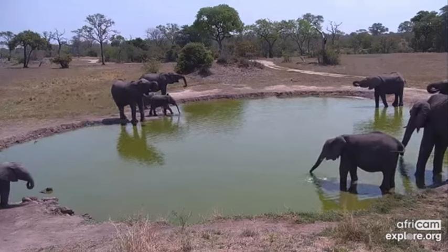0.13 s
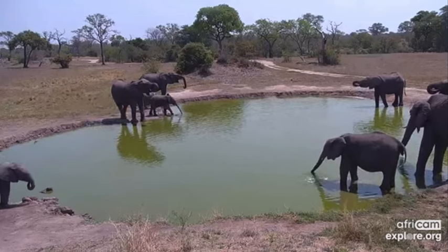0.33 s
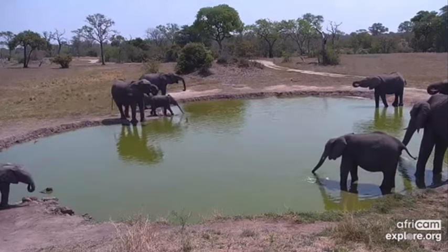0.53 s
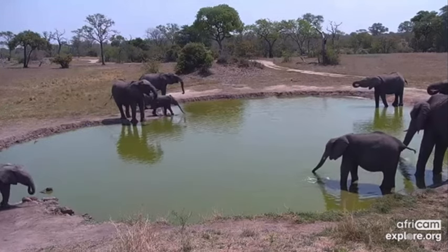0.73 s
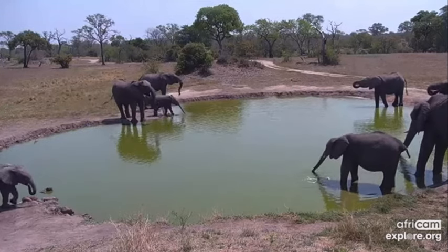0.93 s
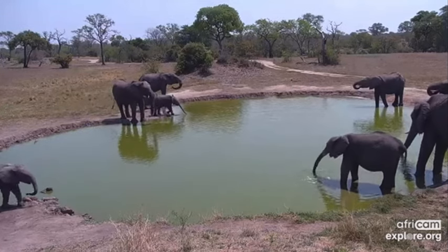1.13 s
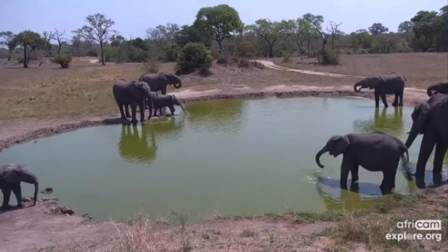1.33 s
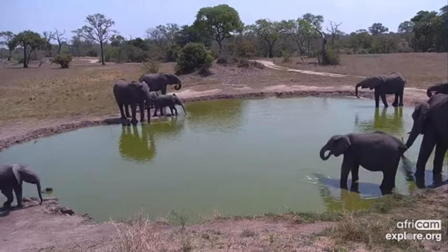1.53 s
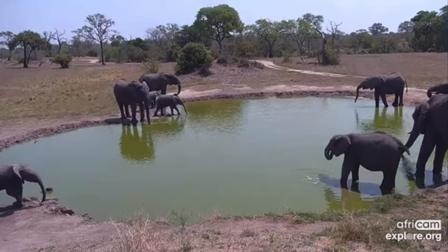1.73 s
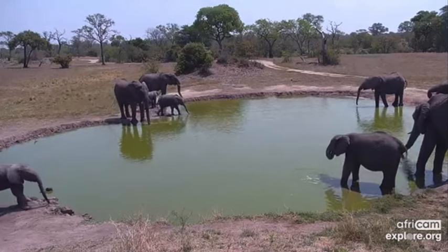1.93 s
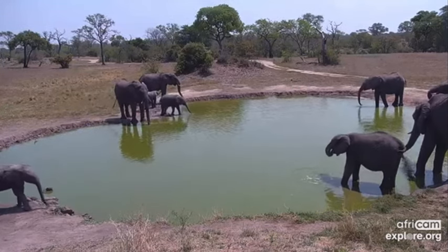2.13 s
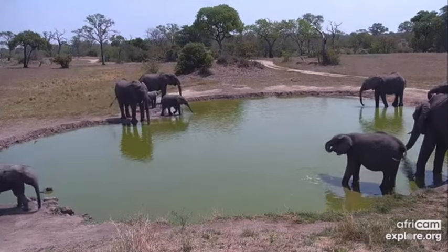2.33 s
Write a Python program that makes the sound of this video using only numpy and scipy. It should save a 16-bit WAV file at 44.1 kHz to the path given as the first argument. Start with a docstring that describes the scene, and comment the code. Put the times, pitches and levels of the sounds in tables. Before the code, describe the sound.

A rough, fluttering elephant rumble enters after nearly a second of water sloshing and bubbling, then stops; more splashing, drips and small bird calls follow. Open waterhole, distant microphone, soft hiss and thin insect trill.

```python
"""Water sloshes, bubbles and drips from the start as animals wade and drink at a waterhole, while insects
trill high over the far hiss of the plain: all shaped noise, with damped and gliding tones for the bubbles.
A wader gives a metallic chip of rattling tones. Then a deep rumble hums in steady low harmonics, and over it
an elephant rumbles: slow, uneven pulses of the vocal folds ring the throat's moving resonances.
A bird's whistle falls, a faint low coo pulses, and the wader chips again; these are gliding tones."""
import sys
import numpy as np
from scipy import signal
from scipy.fft import rfft, irfft, next_fast_len
from scipy.io import wavfile
from scipy.ndimage import uniform_filter1d, map_coordinates

SR = 44100
rng = np.random.default_rng(int(sys.argv[2]) if len(sys.argv) > 2 else 0)


def output_pcm(signal):
    """Save a mono or channel-first signal as 16-bit PCM at the path in sys.argv[1].

    Samples are clipped to [-1, 1] before scaling.
    """
    pcm = np.clip(np.atleast_2d(signal).T, -1, 1) * 32767
    wavfile.write(sys.argv[1], SR, np.round(pcm).astype(np.int16))


N = 110250
T = np.arange(N) / SR  # time of every sample, s

# All table levels are relative: the functions add small trims to them.
# Far hiss of the plain: f/Hz, level per Hz/dB
PLAIN_SPECTRUM = [(15, -45), (25, 10.5), (439, -5), (695, -6), (1100, -9), (3760, -10), (4390, -14.5),
                  (7320, -8), (8750, -14.5), (11300, -25.5), (14700, -61), (22000, -120)]
# Insects: t/s, trill level/dB, upper band level/dB
INSECT_LEVELS = [(0, -62, -44), (.15, -64, -53.5), (.6, -48.5, -47.5), (.68, -57, -46.5), (.8, -60, -53),
                 (.88, -43, -48.5), (1.12, -46.5, -50), (1.25, -61, -50.5), (1.8, -55, -53),
                 (2.2, -52.5, -50.5), (2.32, -51.5, -52.5), (2.5, -41, -48)]
# Falling bird whistle: t/s, f/Hz, level/dB
WHISTLE_PATH = [(1.508, 4890, -63), (1.512, 5030, -49), (1.518, 5000, -31), (1.53, 4713, -32),
                (1.566, 4760, -36), (1.592, 4480, -34), (1.606, 4300, -57)]
# Faint low coo: t/s, f/Hz, level/dB
COO_PATH = [(2.09, 545, -52), (2.146, 574.6, -37), (2.162, 564, -50), (2.184, 575, -35), (2.2, 570, -57),
            (2.212, 577, -38.5), (2.33, 585, -56)]
# The wader's chips: t/s, level/dB, f/Hz, time before the fade/s
CHIP_CALLS = [(.6528, -29.5, 1925, .034), (2.2, -32, 1885, .037)]
# Tones in a chip: multiple of f, level/dB, rattle knots per second, rattle depth,
# swell toward the crest/dB, time to fade by 60 dB/s
CHIP_PARTS = [(1, 5, 260, .6, 6, .07), (1.93, 4.5, 600, 1.0, 18, .14), (3.07, 2, 750, 1.1, 35, .1),
              (4.12, -10, 400, 1.1, 50, .05)]
# Moving water: t/s, gurgle level/dB, spray level/dB, fizz level/dB
SLOSH_LEVELS = [(0, -37, -67, -61), (.1, -39, -46, -56.5), (.21, -41.5, -41.5, -56),
                (.23, -29.5, -34.5, -53), (.4, -34, -34.5, -53.5), (.53, -35, -39, -54),
                (.56, -42, -40.5, -53.5), (.64, -38, -43, -59.5), (.7, -38.5, -39.5, -49),
                (.8, -35.5, -41.5, -91), (.88, -46.5, -49, -61.5), (.97, -39, -43.5, -61),
                (1.25, -38.5, -38, -60.5), (1.38, -30, -34, -51), (1.6, -27, -34, -49.5),
                (1.69, -27, -34, -48.5), (1.82, -30, -35, -46.5), (1.95, -33, -44, -48.5),
                (2.03, -34, -45, -52.5), (2.065, -40.5, -47, -58.5), (2.1, -41, -36.5, -51.5),
                (2.15, -45, -42.5, -64), (2.25, -44.5, -45, -50.5), (2.32, -47.5, -79, -68.5),
                (2.5, -45, -47, -61)]
# Colours of the three water noises: f/Hz, level per Hz/dB
GURGLE_SPECTRUM = [(120, -46), (200, -12), (332, -7.5), (399, -8), (640, -6), (1000, -13), (1500, -17),
                   (1950, -16.5), (3300, -120)]
SPRAY_SPECTRUM = [(530, -42), (900, -4), (1010, -40), (1140, -11.5), (1360, -10.5), (2810, -2.5),
                  (4500, -27.5), (5850, -42), (9900, -120)]
FIZZ_SPECTRUM = [(2240, -9.5), (3800, -6.5), (4330, -17.5), (5410, -9.5), (6220, -19.5), (7450, -13.5),
                 (10600, -24.5), (11200, -33), (14600, -51), (22000, -120)]
# Loud single bubbles: t/s, start f/Hz, end pitch over start pitch, length/s, peak level/dB
LOUD_BUBBLES = [(.005, 428, 0.93, 0.022, -27), (0.03, 560, 1.17, 0.011, -24.5),
                (0.581, 742, 1.28, 0.025, -31.5), (0.619, 1020, 2.5, 0.0088, -26.5),
                (0.672, 228, 1.3, 0.013, -27.5), (0.685, 433, 1.07, .022, -25),
                (0.736, 1070, 1.02, 0.03, -32), (.771, 576, 2.07, 0.031, -24.5),
                (.776, 285, 1.03, 0.022, -27), (1.654, 431, 1.01, 0.075, -23),
                (0.22, 600, 1.3, 0.0098, -33.5), (1.999, 615, 1.17, 0.03, -25.5),
                (2.141, 704, 2.13, 0.0215, -32.5), (2.343, 530, 1.93, 0.015, -33.5),
                (2.353, 670, 1.83, 0.041, -37)]
# Drips: t/s, level/dB, start f/Hz
DRIP_TIMES = [(.109, -16.5, 3170), (0.129, -21, 3720), (0.318, -9.5, 2020), (0.401, -15.5, 1570),
              (0.596, -17.5, 5500), (0.596, -17.5, 6920), (.928, -18.5, 3690), (1.0525, -22, 4260),
              (1.138, -24, 4770), (1.334, -17.5, 3347), (2.457, -22, 3600), (1.523, -11, 2550),
              (1.572, -12, 1750), (1.613, -10, 1739), (1.799, -15, 1330), (1.966, -16.5, 2860),
              (2.044, -18, 2720), (2.103, -21, 2020), (2.103, -15.5, 3100), (2.157, -20, 2100)]
# Broad ticks of water: t/s, level/dB
TICKS = [(0.224, -21.5), (0.254, -23), (0.5826, -21.5), (1.273, -20), (2.0052, -18.5), (2.085, -22),
         (2.4562, -23)]
# Deep rumble: t/s, level/dB, pitch f/Hz
DEEP_PATH = [(0.85, -44, 24.28), (1.0, -33, 24.6), (1.598, -28, 24.49), (1.8, -41, 24.82),
             (2.132, -44, 24.16), (2.186, -67, 23.9), (2.25, -47, 24.73), (2.472, -54, 24.8),
             (2.5, -34, 24.6)]
# Its harmonics: multiple of the pitch, level/dB
DEEP_HARMONICS = [(2, 2.5), (3, 0), (4, -3), (5, 3.5), (6, -10), (7, 0), (8, -11)]
# Chest resonances for its noise: f/Hz, width/Hz, level/dB
CHEST_RESONANCES = [(49.7, 26, -10.5), (127, 53, -5.5), (174, 97, -8)]
# Elephant's rumble: t/s, level/dB, level of the upper two resonances/dB
VOICE_LEVELS = [(0.9, -46, -24), (0.925, -22.5, -16), (0.952, -30, -7), (1.004, -17, -0.5),
                (1.064, -16, -4), (1.078, -21.5, 4.5), (1.126, -24.5, -4), (1.148, -17, -10.5),
                (1.166, -20.5, -4), (1.194, -15.5, -17), (1.214, -29, 3), (1.233, -19.5, -20),
                (1.29, -18.5, -4.5), (1.338, -26, -16), (1.364, -24.5, -6), (1.404, -18, -26),
                (1.448, -25, 3.5), (1.464, -21, -13), (1.487, -13, 0), (1.518, -22, -8), (1.572, -18.5, -1),
                (1.625, -18, -19), (1.65, -36, -9)]
# Vocal folds: t/s, cycles per second f/Hz
FOLD_RATE = [(.92, 22.5), (.99, 26), (1.03, 26.5), (1.07, 19.5), (1.12, 18), (1.165, 28), (1.25, 27),
             (1.3, 22), (1.4, 27), (1.47, 22), (1.52, 20.5), (1.65, 28.2)]
# Throat: t/s, first, second and third resonance f/Hz, share of the first held as a tone (0-1)
THROAT_SHAPE = [(.9, 292, 847, 1200, .05), (1.03, 297, 862, 1200, .05), (1.1, 291, 863, 1300, 0.054),
                (1.2, 284, 874, 1880, .05), (1.28, 281, 894, 1850, .08), (1.4, 265.8, 1010, 1860, 0.12),
                (1.49, 258.4, 1036, 1850, 0.24), (1.52, 246.8, 1002, 1740, 0.98),
                (1.65, 236, 990, 1780, 0.98)]

PLAIN_DB = -36
TRILL_HZ, TRILL_WIDE_HZ, TRILL_PER_S, TRILL_DEPTH_DB = 7130, 350, 42, 3
UPPER_HZ, UPPER_WIDE_HZ = 8270, 1230
COO_PULSES_PER_S = 27.9
CHIP_WAVER, CHIP_CLICK_DB = 0.0122, 11  # random pitch waver (ratio), opening click
CHIP_CREST, CHIP_BEND = 0.5, 0.055  # when the pitch peaks (share of the hold), how far it sags
CHIP_ECHO_T60_S, CHIP_ECHO_DB = 0.76, -19.5  # a t60 is the time to fade by 60 dB
BUBBLES_PER_S, BUBBLE_HZ, BUBBLE_DB = 500, 610.5, -3
DROPS_PER_S, DROP_HZ, DROP_DB = 1500, 2452, 0.5
TICK_T60_S, DRIP_CYCLES = 0.043, 22
LOW_NOISE_DB = -2.5  # noise in the deep rumble, against its tones
FIRST_PULSE_S, JITTER_S, SCATTER_DB = 0.923, 0.000903, 1.8  # jitter in time, scatter in level
SECOND_AT, SECOND_DB = 0.49, -1.4  # weaker second closure: share of the cycle, level
RING1_S, RING2_S, RING3_S, PUFF_S = 0.19, 0.074, 0.12, 0.11  # t60s of resonances and air puff
PUFF_DB, RASP_DB = -6.5, -6  # air puff; breath noise near the first resonance
FIRST_DB, RING2_DB, THIRD_DB, HELD_DB = 10.5, 4, -7, 3.5  # three resonances and the held tone
CLOSE_S = 0.0018  # time constant of the swap from old ringing to new
ECHO_T60_S, ECHO_DB = 0.11, -13.5
TOP_HZ = 11100


def amp(db):
    """Turn dB into gain."""
    return 10 ** (np.asarray(db) / 20)


def unit(x):
    """Scale to an average strength (rms) of 1."""
    return x / np.sqrt(np.mean(x ** 2) + 1e-20)


def curves(rows, t=T):
    """Read each column after the time column, at times t."""
    s, *cols = np.transpose(rows)
    return [np.interp(t, s, c) for c in cols]


def gate(start_s, end_s, fade_s):
    """Stay at 1 between two times, with straight ramps inside the ends."""
    return np.clip(np.minimum(T - start_s, end_s - T) / fade_s, 0, 1)


def wobble(rate):
    """Draw a smooth random curve through rate knots a second."""
    return map_coordinates(rng.standard_normal(4096), [T * rate])


def filtered(x, response):
    """Shape x by a gain that depends on frequency."""
    m = next_fast_len(N + SR // 2)
    return irfft(rfft(x, m) * response(np.fft.rfftfreq(m, 1 / SR)), m)[:N]


def peak(f, hz, wide_hz):
    """One resonance: it passes sound near hz and weakens the rest."""
    return 1j * f * wide_hz / (hz * hz - f * f + 1j * f * wide_hz)


def noise_through(response):
    """White noise through a filter, scaled to rms 1."""
    return unit(filtered(rng.standard_normal(N), response))


def rush(spectrum, patchy_db):
    """Coloured noise of rms 1, with patches of random gain in time and frequency."""
    z = signal.stft(rng.standard_normal(N + 512), nperseg=256)[2]
    patches = uniform_filter1d(rng.standard_normal(z.shape), 4, 0)
    patches = uniform_filter1d(patches, 5, 1)
    x = signal.istft(z * amp(patchy_db * unit(patches)), nperseg=256)[1][:N]
    f, db = np.transpose(spectrum)
    return unit(filtered(x, lambda hz: amp(np.interp(np.log(hz + 1), np.log(f), db, -120, -120))))


def rings(s, hz, gain, t60, rise=1, attack_s=0.00063, size=4096):
    """Damped sines, one for each start time; pitch climbs by the ratio rise over half the t60."""
    s, hz, gain, t60, rise = (np.asarray(v, float).reshape(-1, 1) for v in (s, hz, gain, t60, rise))
    t = np.arange(size) / SR
    envelope = gain * amp(-60 * t / t60) * (1 - np.exp(-t / attack_s))
    wave = envelope * np.sin(2 * np.pi * hz * (t + (rise - 1) * t * t / t60))
    at = np.round(s * SR).astype(int) + np.arange(size)
    return np.bincount(at.ravel(), wave.ravel(), N + size)[:N]


def glide(rows, fade_s):
    """A pure tone along rows of time, pitch and level."""
    hz, db = curves(rows)
    tone = np.sin(2 * np.pi * np.cumsum(hz) / SR)
    return gate(rows[0][0], rows[-1][0], fade_s) * amp(db + 2.0) * tone


def echoes(x, t60):
    """The banks answer with a diffuse tail of fading noise."""
    t = np.arange(SR // 3) / SR
    tail = rng.standard_normal(len(t)) * amp(-60 * t / t60) * (t > 0.012)
    return signal.fftconvolve(x, tail / np.linalg.norm(tail))[:N]


def plain():
    """The far hiss: patchy coloured noise."""
    return amp(PLAIN_DB - 6) * rush(PLAIN_SPECTRUM, patchy_db=3.0)


def insects():
    """A pulsing narrow trill and a broader band above it, both resonant noise."""
    trill_db, upper_db = curves(INSECT_LEVELS)
    trill = noise_through(lambda f: peak(f, TRILL_HZ, TRILL_WIDE_HZ) ** 2)
    upper = noise_through(lambda f: peak(f, UPPER_HZ, UPPER_WIDE_HZ) ** 2)
    pulse_db = TRILL_DEPTH_DB * np.sin(2 * np.pi * TRILL_PER_S * T)
    upper_db = upper_db + 0.82 * pulse_db + 0.9 * wobble(28.0)
    return amp(trill_db + pulse_db) * trill + amp(upper_db) * upper


def birds():
    """A falling whistle and a faint pulsing coo, each a pure gliding tone."""
    pulses = 1 + 0.5 * np.sin(2 * np.pi * COO_PULSES_PER_S * T)
    return glide(WHISTLE_PATH, fade_s=0.0041) + glide(COO_PATH, fade_s=0.018) * pulses


def chips():
    """Two rattling metallic chips open with a click; pitch arches, upper tones swell and trail off."""
    out = np.zeros(N)
    for s, db, hz, hold in CHIP_CALLS:
        u = (T - s) / hold
        off_crest = (np.clip(u, 0, 1) - CHIP_CREST) ** 2
        sag = (np.clip(u, 0, 1.5) - CHIP_CREST) ** 2
        for multiple, tone_db, rate, depth, swell_db, t60 in CHIP_PARTS:
            attack = np.clip((T - s) / 0.0009, 0, 1)
            fade_db = -60 * np.maximum(T - s - hold, 0) / t60
            shape = attack * amp(-swell_db * off_crest + fade_db)
            bend = 1 - CHIP_BEND * sag + CHIP_WAVER * wobble(150)
            tone = np.sin(2 * np.pi * np.cumsum(hz * multiple * bend) / SR)
            rattle = 1 + depth * wobble(rate)
            out += shape * amp(db + tone_db) * rattle * tone
        out += rings(s, 2860, amp(db + CHIP_CLICK_DB), 0.014, attack_s=0.00044)
    return out + amp(CHIP_ECHO_DB) * echoes(out, CHIP_ECHO_T60_S)


def swarm(per_s, hz, spread, cycles, rise, size):
    """Random bubbles of rms 1 in all: pitches spread around hz, few loud and many soft."""
    when, u1, u2, loud = rng.random((int(per_s * N / SR), 4)).T
    bell = np.sqrt(-2 * np.log(u1 + 1e-9)) * np.cos(2 * np.pi * u2)  # bell-curve draws
    pitch = np.clip(hz * np.exp(spread * bell), hz / 3, hz * 3)
    gain = amp(-4 * np.log(loud + 0.056))
    return unit(rings(when * N / SR, pitch, gain, cycles / pitch, rise, size=size))


def slosh():
    """Gurgle, spray and fizz surge as coloured noise, the first two with small bubbles in them."""
    low_db, mid_db, high_db = curves(SLOSH_LEVELS)
    bubbles = swarm(BUBBLES_PER_S, BUBBLE_HZ, 0.344, cycles=20.4, rise=1.408, size=2048)
    drops = swarm(DROPS_PER_S, DROP_HZ, 0.388, cycles=12.6, rise=1.104, size=640)
    gurgle = rush(GURGLE_SPECTRUM, patchy_db=2.0) + amp(BUBBLE_DB) * bubbles
    spray = rush(SPRAY_SPECTRUM, patchy_db=4.5) + amp(DROP_DB) * drops
    fizz = rush(FIZZ_SPECTRUM, patchy_db=2.16)
    surge_db = 1.26 * wobble(40.26)
    out = amp(low_db - 1.0 + surge_db) * gurgle + amp(mid_db - 2.2 + surge_db) * spray
    return out + amp(high_db + 13.5 + 1.1 * surge_db) * fizz


def loud_bubbles():
    """Single bubbles: each a short tone that swells and fades as its pitch slides."""
    out = np.zeros(N)
    for s, hz, rise, length, db in LOUD_BUBBLES:
        u = np.clip((T - s) / length, 0, 1)
        cycles = hz * length * (u + (rise - 1) * u * u / 2)
        out += amp(db) * np.sin(np.pi * u ** 0.46) * np.sin(2 * np.pi * cycles)
    return out


def ticks():
    """Broad ticks of water: bursts of resonant noise that start at once and die away."""
    noise = noise_through(lambda f: peak(f, 2560, 3600) ** 2)
    return noise * sum((T > s) * amp(db - 8.5 - 60 * np.abs(T - s) / TICK_T60_S) for s, db in TICKS)


def drips():
    """Each drip is a damped tone with a slightly rising pitch."""
    s, db, hz = np.transpose(DRIP_TIMES)
    t60 = DRIP_CYCLES / hz + 0.0069
    return rings(s, hz, amp(db - 2.5), t60, 1.094, attack_s=0.00044, size=2048)


def water():
    """All the water: sloshing, loud bubbles, ticks and drips."""
    return slosh() + loud_bubbles() + ticks() + drips()


def chest(f):
    """The chest's resonances, added with alternating sign and shaped by a broad one."""
    parts = sum((-1) ** j * amp(g) * peak(f, hz, wide) for j, (hz, wide, g) in enumerate(CHEST_RESONANCES))
    return parts * peak(f, 110, 230)


def deep_rumble():
    """Clean low harmonics of one slow pitch, with noise from the chest's resonances."""
    db, hz = curves(DEEP_PATH)
    phase = 2 * np.pi * np.cumsum(hz) / SR
    tones = sum(amp(g + 1.66 * wobble(8.94)) * np.cos(k * phase + 0.292 * k * k) for k, g in DEEP_HARMONICS)
    mix = unit(tones) + amp(LOW_NOISE_DB) * noise_through(chest)
    return gate(DEEP_PATH[0][0], DEEP_PATH[-1][0], 0.062) * amp(db - 2.5) * mix


def rumble():
    """Two fold closures a cycle; each restarts the throat's ringing and lets out a puff of air."""
    phase = np.cumsum(curves(FOLD_RATE)[0] * (T > FIRST_PULSE_S)) / SR
    k = np.arange(48)  # closure number; odd ones are the second in their cycle
    luck = rng.standard_normal((len(k), 3))  # random timing, level and third pitch
    s = np.interp(k // 2 + SECOND_AT * (k % 2) + 1e-4, phase, T)
    s = np.sort(s + JITTER_S * luck[:, 0])
    last = np.clip(np.searchsorted(s, T) - 1, 0, None)  # latest closure at each sample
    db, upper_db = curves(VOICE_LEVELS)

    def time_since(j):
        """Seconds since closure j; before the first closure, 1 s, by which ringing has died."""
        return np.where(T > s[0], T - s[j], 1)

    def rung(j):
        """The three resonances as closure j left them ringing."""
        since = time_since(j)
        hz1, hz2, hz3, share = curves(THROAT_SHAPE, s[j])
        hz3 = hz3 * (1 + 0.0325 * luck[j, 2])
        ring = lambda hz, t60: amp(-60 * since / t60) * np.sin(2 * np.pi * hz * since)
        wave = (1 - np.clip(share, 0, 1)) * amp(FIRST_DB + SECOND_DB * (j % 2)) * ring(hz1, RING1_S)
        wave += amp(upper_db + RING2_DB) * ring(hz2, RING2_S)
        wave += amp(upper_db + THIRD_DB) * ring(hz3, RING3_S)
        return -amp(SCATTER_DB * luck[j, 1]) * wave

    since = time_since(last)
    old = np.exp(-since / CLOSE_S)  # what is left of the ringing before
    hz, *_, share = curves(THROAT_SHAPE)
    share = np.clip(share, 0, 1)
    held = share * amp(HELD_DB + 1.4 * wobble(29.4)) * np.sin(2 * np.pi * np.cumsum(hz) / SR)
    air = noise_through(lambda f: peak(f, 315, 330) + 0.5 * peak(f, 1120, 730))
    rasp = noise_through(lambda f: peak(f, 265, 110) ** 2)
    throat = (1 - old) * rung(last) + old * (last > 0) * rung(np.maximum(last - 1, 0)) + held
    throat += amp(PUFF_DB - 60 * since / PUFF_S) * air
    throat += amp(RASP_DB) * (1 - share) * rasp
    throat *= gate(VOICE_LEVELS[0][0], VOICE_LEVELS[-1][0], 0.024) * amp(db)
    return filtered(throat, lambda f: peak(f, 650, 2200) ** 3)


def scene():
    """Add the background, the water, and the calls with their echoes."""
    far = plain() + insects()
    calls = birds() + rumble()
    echoed = calls + amp(ECHO_DB) * echoes(calls, ECHO_T60_S)
    return (far + chips() + water() + deep_rumble() + echoed)[None]


def record(dry):
    """The microphone weakens the deepest bass; nothing passes above the band limit."""
    return filtered(dry[0], lambda hz: (hz < TOP_HZ) * (1j * hz / (42 + 1j * hz)) ** 2)[None]


dry = scene()
out = record(dry)
output_pcm(out)
```